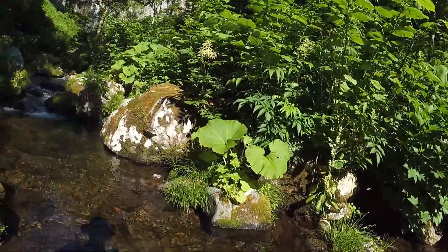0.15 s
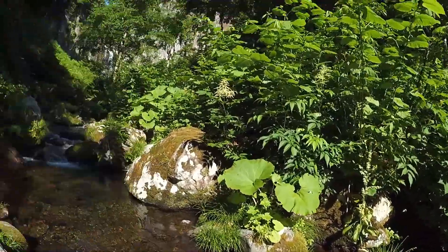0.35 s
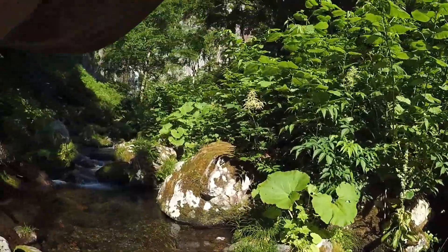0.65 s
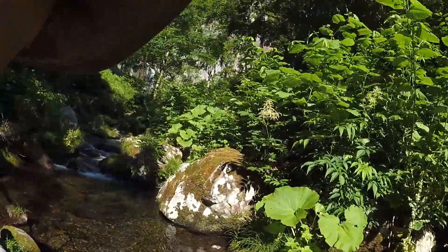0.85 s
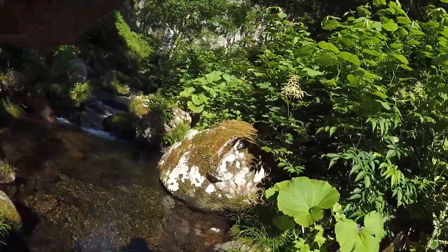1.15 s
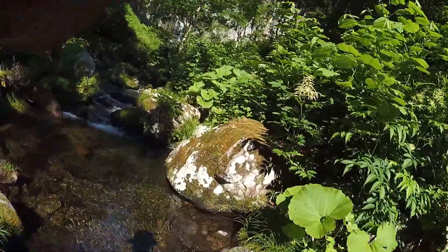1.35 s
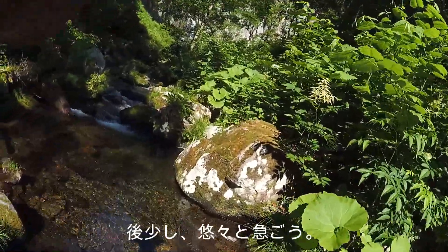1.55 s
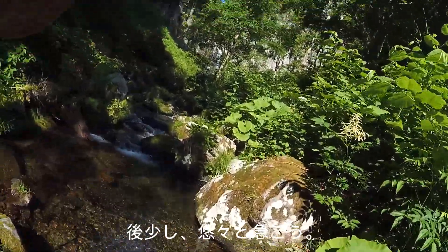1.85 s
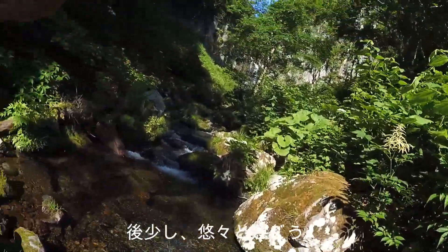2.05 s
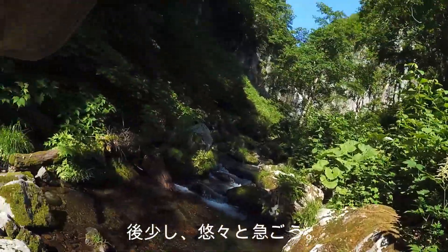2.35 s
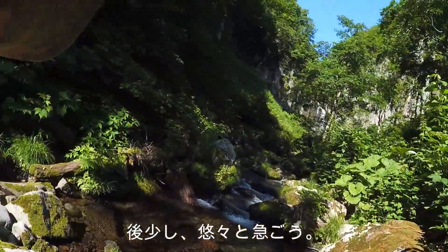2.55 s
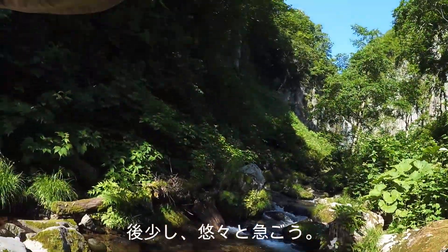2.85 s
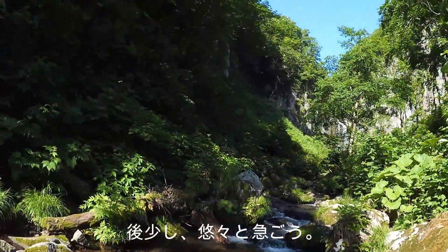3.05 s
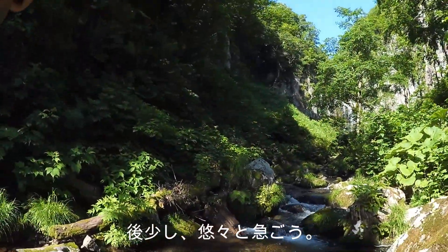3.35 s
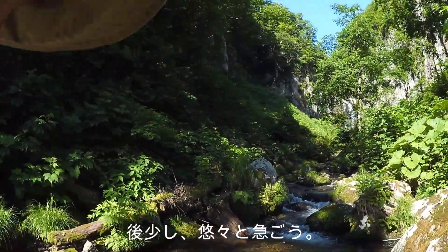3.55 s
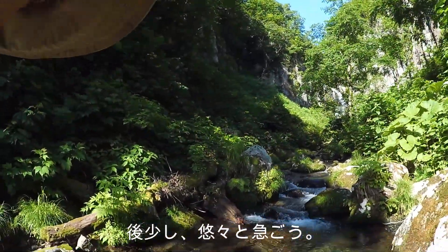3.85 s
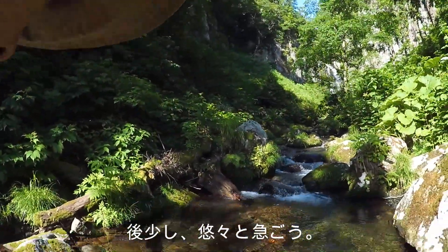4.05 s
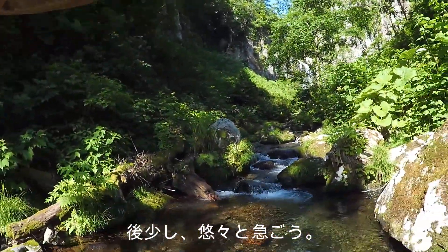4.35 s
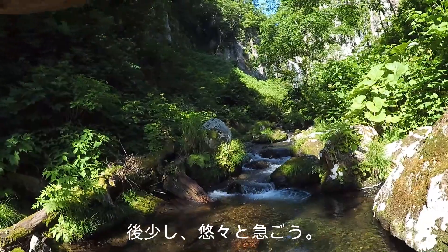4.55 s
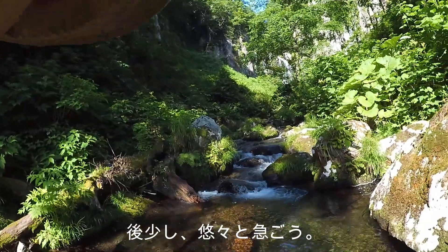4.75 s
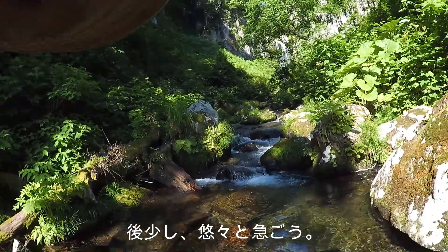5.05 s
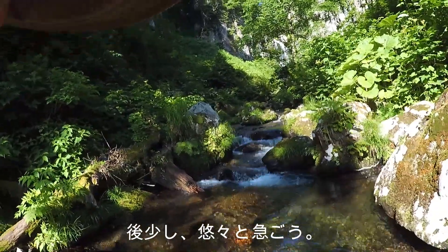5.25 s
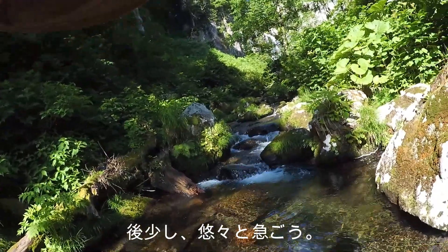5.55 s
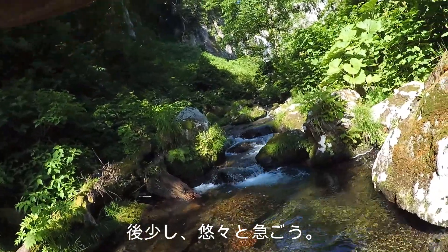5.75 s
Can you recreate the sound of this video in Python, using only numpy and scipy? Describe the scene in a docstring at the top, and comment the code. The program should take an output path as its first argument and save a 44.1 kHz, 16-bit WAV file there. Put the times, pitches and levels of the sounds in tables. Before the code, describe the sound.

A small mountain stream rushes and gurgles over rocks, swelling toward a cascade, while a little bell jingles and stones knock underfoot.

```python
"""A mountain stream rushes, splashes and gurgles, swelling to about 5 s as a walker nears a small cascade, then easing.
Banded noise makes the rush, swarms of short ringing bubbles the splashes and gurgles, rising sines a few hollow plops.
A small bell on the walker's pack jingles: two beating low modes under brief metallic overtones.
Stones knock (noise cracks and ringing modes), boots tread the grit, and one sole slides in gravel.
The sound has a strong peak near 2 kHz and a deep gap around 7.5 kHz."""
import sys
import numpy as np
from scipy import signal
from scipy.fft import rfft, irfft
from scipy.io import wavfile

SR = 44100
rng = np.random.default_rng(int(sys.argv[2]) if len(sys.argv) > 2 else 0)


def inscribe(sig):
    """Save sig as 16-bit PCM at rate SR to the path in sys.argv[1].

    A 1-D sig is mono; a 2-D sig holds one channel per row.
    Samples are clipped to [-1, 1] before scaling.
    """
    pcm = np.round(np.clip(np.atleast_2d(sig).T, -1, 1) * 32767)
    wavfile.write(sys.argv[1], SR, pcm.astype(np.int16))


N = 261072
TIME = np.arange(N) / SR
BIN_HZ = np.maximum(np.fft.rfftfreq(N, 1 / SR), 1)

# spectrum of the water: (frequency [Hz], relative level per Hz [dB])
WATER_SPECTRUM = [(30, -27), (100, -45), (170, -41), (280, -30), (500, -18), (720, -14), (1000, -10.5),
                  (1300, -10.5), (2000, -13), (4000, -12), (6000, -16), (12000, -19.5), (16000, -23)]
# left-right correlation of the noise: (frequency [Hz], likeness [0-1])
STEREO_LIKENESS = [(60, 1), (150, 0.5), (500, 0.91), (1000, 0.87), (1800, 0.91), (4200, 0.8), (5500, 0.64),
                   (7000, 0), (15000, 0.4)]
# level of the cascade as the walker nears it: (time [s], level [dB])
CASCADE_LEVEL = [(0.0, -39.5), (0.26, -39), (0.4, -41), (1.0, -41), (5.06, -34), (5.92, -36.5)]
# centre of a moving hollow in the water's spectrum: (time [s], frequency [Hz])
HOLLOW_PITCH = [(0, 1290), (0.8, 1360), (1.6, 1130), (2.5, 955), (5.92, 980)]
# hiss and low roar come from the whole stream and follow only a share of the cascade's swell in dB
HISS_FOLLOWS, ROAR_FOLLOWS = 0.63, 0.56

# the clapper strikes or grazes the bell, levels before the bell's own mix:
# (time [s], lower twin [dB], upper twin [dB], ping [dB], shimmer [dB])
BELL_STRIKES = [(0.0, -41, -35.5, -62, -75), (0.05, -39, -35, -53.5, -62), (0.078, -41, -30.5, -70, -72),
                (0.113, -35.5, -28.5, -70, -74), (0.18, -33, -31, -77, -79), (0.228, -30, -39, -78, -75),
                (0.405, -23.5, -42, -33.5, -38), (0.445, -27, -36, -70, -70),
                (0.475, -28.5, -31.5, -73, -68), (0.555, -38.5, -48, -72, -72), (0.624, -52, -37, -70, -65),
                (0.69, -48, -54, -54.5, -62), (1.682, -35, -41, -36, -37), (1.776, -47, -37.5, -68, -62),
                (1.939, -38, -47, -69, -61), (2.02, -42.5, -50, -75, -75), (2.097, -28, -24, -34, -37),
                (2.165, -32, -37.5, -47, -66), (2.265, -44, -36, -72, -72), (2.412, -58, -32, -40, -39),
                (2.465, -56, -31.5, -48.5, -70), (2.517, -39, -48, -49, -47), (3.012, -66, -64, -55, -54),
                (3.265, -34.5, -45, -74, -72), (3.325, -52, -34.5, -72, -72),
                (3.365, -35.5, -29.5, -44.5, -51), (3.44, -34, -39, -82, -79),
                (3.533, -32.5, -49, -66, -61), (3.575, -58, -52, -72, -72), (3.64, -47, -36, -60, -60),
                (3.725, -40, -48, -66, -64), (3.854, -38, -34.5, -49, -46), (3.97, -48, -42.5, -74, -72),
                (4.081, -36.5, -37, -39, -39), (4.13, -44, -38, -67, -68), (4.296, -31.5, -43, -54, -54),
                (4.335, -48, -50, -70, -70), (4.37, -35.5, -51, -50.5, -51), (4.45, -39, -41, -64, -59),
                (4.589, -34.5, -39, -57, -66), (4.66, -40, -65, -72, -79), (5.12, -37, -33, -47, -43),
                (5.16, -40, -33, -65, -68), (5.205, -41, -34, -68, -70), (5.25, -50, -35.5, -66, -70),
                (5.453, -37, -37, -55, -47), (5.51, -36, -47, -72, -72), (5.595, -38.5, -58, -72, -72),
                (5.69, -36.5, -49, -65, -66), (5.83, -42, -40, -72, -72)]
# the lowest mode is split in two twins that beat: (frequency [Hz], t60 [s])
HUM_TWINS = [(3030.6, 0.62), (3073.6, 0.61)]
# overtones that follow the ping level: (frequency [Hz], relative level [dB], t60 [s])
PING_MODES = [(8150, 6, .34), (12050, 4.5, .28)]
# overtones that follow the shimmer level: (frequency [Hz], relative level [dB], t60 [s])
SHIMMER_MODES = [(8333, -1, .15), (9480, -6, .07), (13060, -7, .07), (13320, 1.5, .16), (13470, 2, .16),
                 (14750, -4, .07), (14890, 0, .12), (14985, -2, .08)]
# a strike with a louder ping than this restarts the hum
FIRM_PING_DB = -43

# stones knock and rebound, levels before the crack and ring mix:
# (time [s], level [dB], t60 [s], pitch of the stone [Hz], crack over ring [dB])
STONE_KNOCKS = [(.3023, -9.5, .011, 2800, -5), (.3047, -13.5, 0.017, 1940, -7.5),
                (.3062, -23, 0.014, 2800, 0.5), (.311, -21, 0.0091, 2730, 0),
                (.3305, -26, 0.0087, 5400, -8), (1.7403, -20, .012, 2300, -11),
                (1.7419, -23, 0.013, 2710, -4.5), (3.1222, -15.5, 0.0042, 3300, -10),
                (3.2665, -23.5, 0.0076, 3600, -5), (3.3246, -19.5, 0.01, 3470, -7),
                (4.264, -24, 0.024, 2290, -9), (4.2742, -26, .02, 2050, -11),
                (4.3001, -14.5, 0.0089, 3080, -9), (4.3443, -19, 0.0085, 3770, -9),
                (4.3598, -24, .008, 2200, -3), (5.189, -13, .018, 2490, -18),
                (5.1921, -15, .012, 2480, -14), (5.2103, -11, .007, 2500, -13),
                (5.2122, -23, .012, 3800, -3), (5.2152, -13, .009, 2950, -15),
                (5.6955, -18, 0.01, 5500, -4.5)]
# colour of the contact crack: (frequency [Hz], gain [dB])
CRACK_COLOUR = [(60, -32), (400, -21), (760, -0.5), (1300, 0), (2100, -6.5), (2700, -1.5), (4000, -4),
                (6000, -0.5), (10000, -4), (13200, 1), (16000, -35)]
# modes of a stone: (multiple of its pitch [ratio], relative level [dB])
STONE_RING_MODES = [(1.003, -1), (1.56, -6.5), (2.1, -22)]

# boots tread, heel first: (time [s], thud [dB], grit [dB])
BOOT_STEPS = [(.31, -63, -39.5), (.879, -64, -78), (2.1, -65, -46), (3.904, -51, -40.5), (4.287, -67, -46),
              (5.222, -57, -42.5)]
# the toe lands after the heel, lighter and higher in pitch
TOE_DELAY_S, TOE_LOSS_DB, HEEL_HZ, TOE_HZ = .06, 2.5, 75.4, 307
# low hollow plops, from bubbles or a toe on hollow stone: (time [s], level [dB], starting pitch [Hz])
HOLLOW_PLOPS = [(2.8, -40, 665), (3.975, -41, 580), (4.953, -35, 690), (5.274, -38.5, 572)]
# a boot slides in the gravel for a moment; rise and fall are exponential time constants
SLIDE_PEAK_S, SLIDE_RISE_S, SLIDE_FALL_S = 4.308, 0.038, 0.074

# overall colour shared by both channels: (frequency [Hz], gain [dB])
SHARED_COLOUR = [(1000, -4.5), (1650, 1.5), (1870, 8), (2020, 15), (2170, 9), (2350, 6), (3000, 4.5),
                 (5300, 5.5), (6400, -2), (6900, -15.5), (7400, -53), (8150, -30), (9000, -13.5),
                 (11500, -6), (13500, -10), (15000, -14), (16000, -29)]
# difference between the two ports: (frequency [Hz], left minus right [dB])
PORT_DIFFERENCE = [(60, -2), (450, 4.5), (750, 6.5), (1400, -1), (2000, -1), (4000, 1.5), (7500, -0.5),
                   (10000, -9.5), (13500, -7.5), (16000, -26.5)]
CUTOFF_HZ = 15400


def from_db(db):
    """Decibels to gain."""
    return 10 ** (np.asarray(db) / 20)


def rms_one(x):
    """Scale to rms 1."""
    return x / np.sqrt(np.mean(x ** 2) + 1e-20)


def at_hz(points, hz):
    """Read a spectrum on a log-frequency axis."""
    f, value = np.transpose(points)
    return np.interp(np.log(hz), np.log(f), value)


def colour(x, curve_db):
    """Causal (minimum-phase) filter shaped by a gain curve over BIN_HZ."""
    cepstrum = irfft(np.log(from_db(curve_db)), N)
    # fold the cepstrum forward in time to make the response causal
    cepstrum[1:N // 2] *= 2
    cepstrum[N // 2 + 1:] = 0
    response = irfft(np.exp(rfft(cepstrum)), N)[:N // 8]
    return irfft(rfft(x, 2 * N) * rfft(response, 2 * N))[..., :N]


def low_pass(x, hz):
    """Gentle first-order Butterworth low-pass."""
    sos = signal.butter(1, min(hz, SR / 2 - 100), fs=SR, output="sos")
    return signal.sosfilt(sos, x + 1e-18)


def high_pass(x, hz):
    """Second-order Butterworth high-pass."""
    return signal.sosfilt(signal.butter(2, hz, "high", fs=SR, output="sos"), x + 1e-18)


def delayed(x, count):
    """Arrive some samples later."""
    return np.pad(x, (count, 0))[:N]


def drift(rate_hz):
    """Smoothed random wander of about rms 1, drawn every 40 samples."""
    r = np.exp(-80 * np.pi * rate_hz / SR)
    noise = rng.standard_normal(N // 40 + 2002)
    slow = signal.lfilter([1], [1, -2 * r, r * r], noise)[2000:]  # skip the run-in
    return np.interp(np.arange(N) / 40, np.arange(len(slow)), rms_one(slow))


def ring(clicks, hz, t60):
    """A two-pole resonator: a unit click sets off a decaying sine of starting height 1."""
    r, w = from_db(-60 / (t60 * SR)), 2 * np.pi * hz / SR
    return signal.lfilter([0, np.sin(w)], [1, -2 * r * np.cos(w), r * r], clicks + 1e-18)


def fade(t, t60):
    """Exponential decay, 60 dB down after t60 seconds."""
    return np.exp(-np.log(1000) * t / t60)


def add(out, s, sound):
    """Mix a short sound in at a given time."""
    i = min(N, max(0, round(s * SR)))
    out[..., i:i + sound.shape[-1]] += sound[..., :N - i]


def stereo_noise(size):
    """White noise whose left-right likeness varies with frequency."""
    hz = np.maximum(np.fft.rfftfreq(size, 1 / SR), 1)
    alike = np.clip(at_hz(STEREO_LIKENESS, hz), 0, 1)
    mid, side = rfft(rng.standard_normal((2, size)))
    both = np.sqrt(1 + alike) * mid + np.sqrt(1 - alike) * side * [[1], [-1]]
    return irfft(both, size) / np.sqrt(2)


def rush(churn_db, count=14):
    """Countless far bubbles merge into noise; its bands churn each on their own over a shared slow surge."""
    spectrum = rfft(stereo_noise(N)) * from_db(at_hz(WATER_SPECTRUM, BIN_HZ))
    band = np.digitize(BIN_HZ, np.geomspace(200, 12000, count - 1))
    surge = .5 * drift(1.0)
    out = np.zeros((2, N))
    for k in range(count):
        out += irfft(spectrum * (band == k), N) * from_db(churn_db * (surge + drift(30)))
    return rms_one(out)


def bubbles(per_s, low_hz, high_hz, cycles, spread_db, count=20):
    """Near bubbles are born in clusters; each rings down 60 dB within a few cycles of its pitch."""
    born = np.flatnonzero(rng.random(N) < per_s * from_db(3 * drift(8)) / SR)
    # most bubbles are soft, a few are loud
    loudness_db = spread_db * np.minimum(rng.exponential(1, len(born)), 4)
    strengths = from_db(loudness_db) * rng.choice([-1, 1], len(born))
    pitch_index = rng.integers(0, count, len(born))
    pitches = np.geomspace(low_hz, high_hz, count) * rng.uniform(.97, 1.03, count)
    out = np.zeros((2, N))
    for k, hz in enumerate(pitches):
        clicks = np.zeros(N)
        clicks[born[pitch_index == k]] = strengths[pitch_index == k]
        # each pitch has its own place between left and right
        level_db = at_hz(WATER_SPECTRUM, hz) + rng.normal(0, 2.5) * np.array([[1], [-1]])
        out += ring(clicks, hz, cycles / hz) * hz * from_db(level_db)
    return rms_one(high_pass(out, low_hz / 2))


def hollow(x, depth_db, octaves):
    """A shallow dip in the spectrum moves in pitch as the walker moves."""
    hz, s, frames = signal.stft(x, SR, nperseg=1024)
    centre_hz = np.interp(s, *np.transpose(HOLLOW_PITCH))
    away = np.log2(np.maximum(hz, 1)[:, None] / centre_hz) / octaves
    return signal.istft(frames * from_db(depth_db * np.exp(-away ** 2)), SR)[1][..., :N]


def stream(rush_db, gurgle_db, babble_db, splash_db):
    """Rush, gurgle, babble and splash share the cascade's swell, strongest in the middle of the range."""
    level_db = np.interp(TIME, *np.transpose(CASCADE_LEVEL))
    swell_db = level_db - level_db.mean()
    hiss_db, roar_db = (HISS_FOLLOWS - 1) * swell_db, (ROAR_FOLLOWS - 1) * swell_db
    water = from_db(rush_db) * rush(churn_db=1.0)
    water += from_db(gurgle_db) * bubbles(per_s=170, low_hz=290, high_hz=1400, cycles=36, spread_db=4.2)
    water += from_db(splash_db) * bubbles(per_s=1100, low_hz=1250, high_hz=6560, cycles=9.3, spread_db=3.5)
    water += from_db(babble_db) * bubbles(per_s=280, low_hz=1800, high_hz=2400, cycles=12, spread_db=2.5)
    water = hollow(water, depth_db=-5.0, octaves=0.31)
    roar, below_hiss = low_pass(water, 1100), low_pass(water, 2100)
    middle, hiss = below_hiss - roar, water - below_hiss
    return from_db(level_db) * (roar * from_db(roar_db) + middle + hiss * from_db(hiss_db))


def bell_hum(soft_rise_s, firm_rise_s):
    """The twin modes beat; a firm strike starts them afresh, a soft touch feeds or damps the running hum."""
    out, t, started = np.zeros(N), TIME[:SR], 0
    rises = [firm_rise_s if ping_db > FIRM_PING_DB else soft_rise_s for _, _, _, ping_db, _ in BELL_STRIKES]
    next_times = [row[0] for row in BELL_STRIKES[1:]] + [TIME[-1]]
    next_rises = rises[1:] + rises[:1]
    for strike, next_s, rise, next_rise in zip(BELL_STRIKES, next_times, rises, next_rises):
        s, *twins_db, ping_db, _ = strike
        onset = max(0, round(s * SR)) / SR
        if ping_db > FIRM_PING_DB:
            started = onset
        twins = np.zeros(len(t))
        for db, (hz, t60) in zip(twins_db, HUM_TWINS):
            # phase runs on from the last firm strike
            twins += from_db(db) * np.sin(2 * np.pi * hz * (t + onset - started)) * fade(t, t60)
        fade_in = np.clip(t / rise, 0, 1)
        fade_out = np.clip(1 - (t + s - next_s) / next_rise, 0, 1)
        add(out, s, twins * fade_in * fade_out)
    return out


def bell_overtones(level_db, tick_db):
    """Metal on metal gives a tick and short overtones; the swinging bell beams each differently to the ports."""
    out, t = np.zeros((2, N)), TIME[:SR // 2]
    for s, _, _, ping_db, shimmer_db in BELL_STRIKES:
        tick = high_pass(rng.standard_normal((2, len(t))), 3500) * fade(t, 0.031)
        sound = from_db(ping_db + tick_db) * tick
        for modes, strength_db in ((PING_MODES, ping_db), (SHIMMER_MODES, shimmer_db)):
            for hz, mode_db, t60 in modes:
                beam = from_db(strength_db + mode_db + rng.normal(0, 0.36, (2, 1)))
                phase = rng.random((2, 1))
                sound += beam * np.sin(2 * np.pi * (hz * t + phase)) * fade(t, t60)
        add(out, s, from_db(level_db) * sound)
    return out


def bell(pan_db):
    """The small bell radiates no bass; it hangs on the left, so its hum reaches the right port later."""
    hum = bell_hum(soft_rise_s=0.004, firm_rise_s=0.0031)
    sound = np.array([hum, delayed(hum, count=3)]) + bell_overtones(level_db=9.5, tick_db=3.0)
    return high_pass(sound, 2100) * from_db([[pan_db / 2], [-pan_db / 2]])


def stones(crack_db, snap_db, ring_db, contact_s):
    """Stone on stone: a one-sample snap, a dry noisy crunch and a ring, all dying within hundredths of a second."""
    cracks, rings, t = np.zeros((2, N)), np.zeros(N), TIME[:SR // 10]
    for s, knock_db, t60, pitch_hz, hardness_db in STONE_KNOCKS:
        decay = from_db(knock_db) * fade(t, t60)
        crunch = rms_one(low_pass(stereo_noise(len(t)), 2 * pitch_hz))
        snap = from_db(snap_db) * (t == 0)
        add(cracks, s, from_db(hardness_db) * decay * (crunch + snap))
        modes = sum(from_db(db) * np.sin(2 * np.pi * pitch_hz * k * t) for k, db in STONE_RING_MODES)
        add(rings, s, decay * modes * (1 - np.exp(-t / contact_s)))
    cracks = colour(cracks, at_hz(CRACK_COLOUR, BIN_HZ))
    return from_db(crack_db) * cracks + from_db(ring_db) * high_pass(rings, 1300)


def footfalls():
    """Heel and toe of every step: (time [s], thud [dB], thud pitch [Hz], grit [dB])."""
    roll = [(0, 0, HEEL_HZ), (TOE_DELAY_S, TOE_LOSS_DB, TOE_HZ)]
    return [(s + late_s, thud_db - loss_db, thud_hz, grit_db - loss_db)
            for s, thud_db, grit_db in BOOT_STEPS for late_s, loss_db, thud_hz in roll]


def boots(thud_t60, grit_t60, grit_low_hz):
    """A sole lands with a soft decaying sine for a thud and grinds the grit, a grainy noise, under it."""
    out, t = np.zeros((2, N)), TIME[:SR // 2]
    for s, thud_db, thud_hz, grit_db in footfalls():
        thud = 2 * np.sin(2 * np.pi * thud_hz * t) * (fade(t, thud_t60) - fade(t, 0.01))
        grains = stereo_noise(len(t)) * rng.exponential(1, len(t))
        grit = rms_one(high_pass(low_pass(grains, 4800), grit_low_hz)) * fade(t, grit_t60)
        add(out, s, from_db(thud_db) * thud + from_db(grit_db) * grit)
    return out


def plops(t60, rise_per_s):
    """Low hollow plops, from bubbles or a toe on hollow stone: short sines gliding up."""
    out, t = np.zeros(N), TIME[:SR // 4]
    for s, level_db, hz in HOLLOW_PLOPS:
        tone = np.sin(2 * np.pi * hz * t * (1 + rise_per_s * t))
        add(out, s, from_db(level_db) * tone * (fade(t, t60) - fade(t, 0.003)))
    return out


def gravel(level_db, grains_per_s, spread_db, low_hz):
    """Under a sliding sole many small pebbles tick against each other, swelling and easing with the weight."""
    grains = (rng.random(N) < grains_per_s / SR) * from_db(spread_db * rng.standard_normal(N))
    # every grain is a noise burst with a t60 of 7.4 ms
    envelope = signal.lfilter([1], [1, -fade(1 / SR, 0.0074)], grains + 1e-18)
    ticks = rms_one(high_pass(low_pass(stereo_noise(N) * envelope, 7500), low_hz))
    from_peak_s = TIME - SLIDE_PEAK_S
    pressure = np.exp(np.minimum(from_peak_s / SLIDE_RISE_S, -from_peak_s / SLIDE_FALL_S))
    return from_db(level_db) * ticks * pressure


def scene():
    """Water all around, the bell and the steps close by."""
    water = stream(rush_db=-1.0, gurgle_db=-17.5, babble_db=-16.5, splash_db=-11.5)
    jingle = bell(pan_db=2.0)
    path = stones(crack_db=1.5, snap_db=10.5, ring_db=-4.0, contact_s=0.000075)
    path += boots(thud_t60=0.09, grit_t60=0.84, grit_low_hz=610)
    hollow_plops = plops(t60=0.098, rise_per_s=0.99)
    path += gravel(level_db=-31.5, grains_per_s=2000, spread_db=2.5, low_hz=1000)
    return water + jingle + hollow_plops + path


def record(dry):
    """A shared colour and a difference between the two ports shape the sound; a steep low-pass cuts the top."""
    shared_db = at_hz(SHARED_COLOUR, BIN_HZ)
    apart_db = at_hz(PORT_DIFFERENCE, BIN_HZ) / 2
    heard = np.array([colour(dry[0], shared_db + apart_db), colour(dry[1], shared_db - apart_db)])
    return signal.sosfilt(signal.ellip(10, .2, 80, CUTOFF_HZ, fs=SR, output="sos"), heard)


dry = scene()
out = record(dry)
inscribe(out)
```